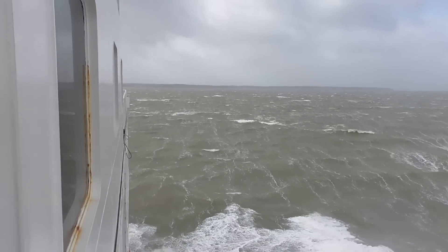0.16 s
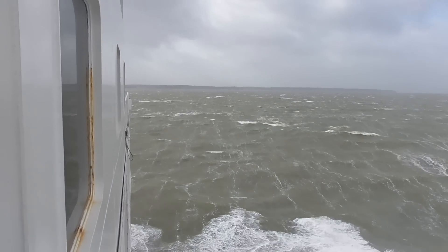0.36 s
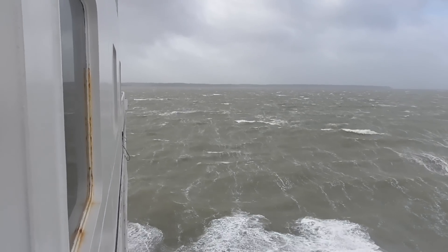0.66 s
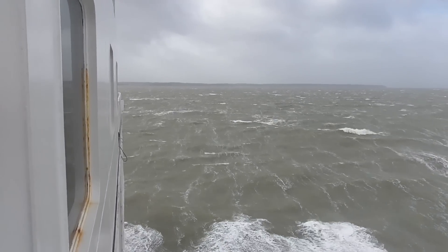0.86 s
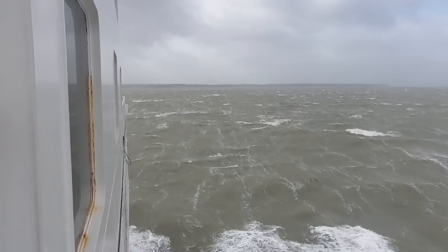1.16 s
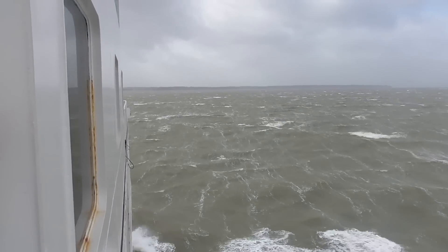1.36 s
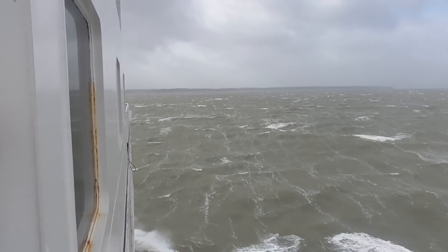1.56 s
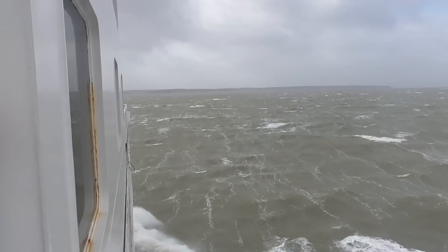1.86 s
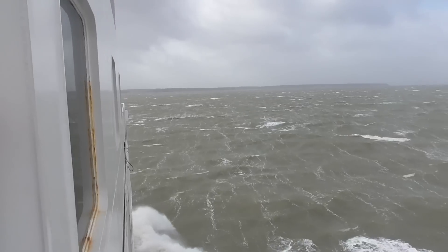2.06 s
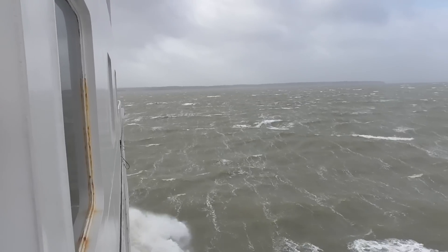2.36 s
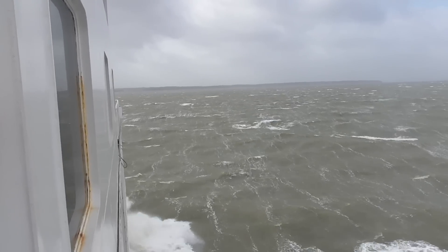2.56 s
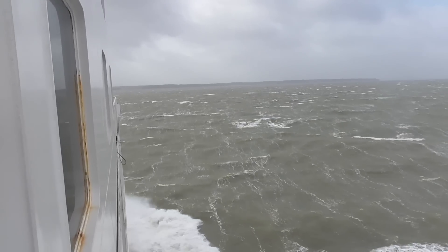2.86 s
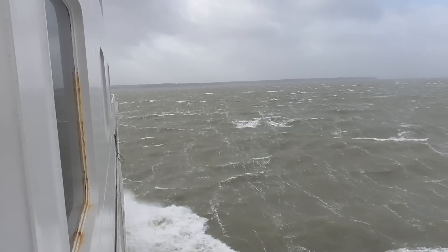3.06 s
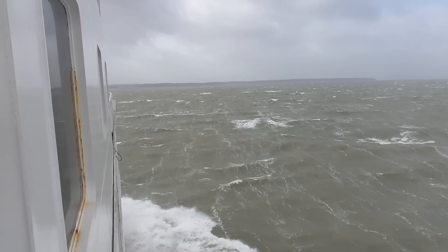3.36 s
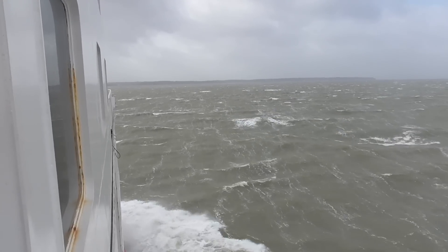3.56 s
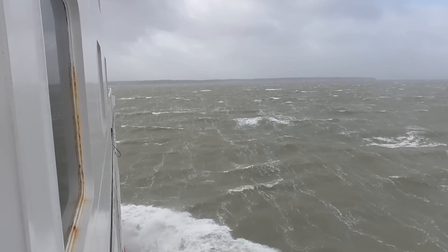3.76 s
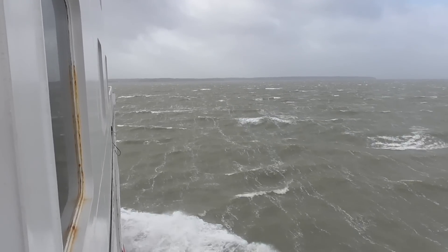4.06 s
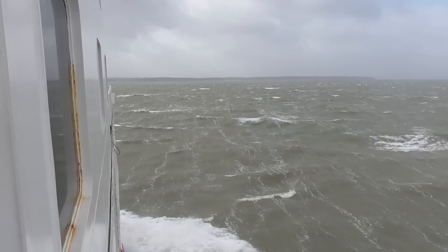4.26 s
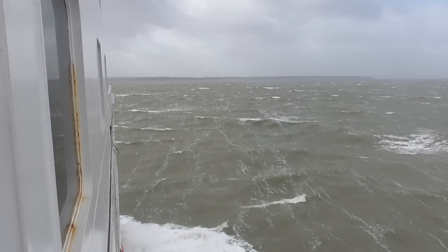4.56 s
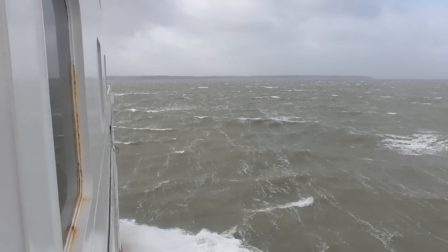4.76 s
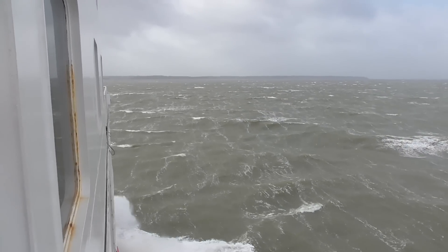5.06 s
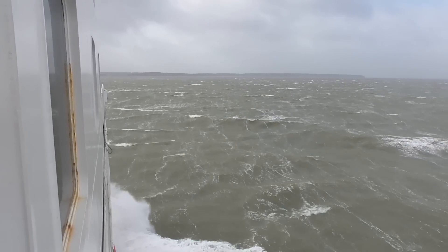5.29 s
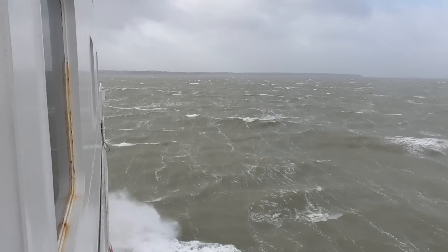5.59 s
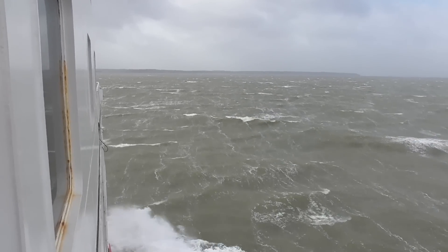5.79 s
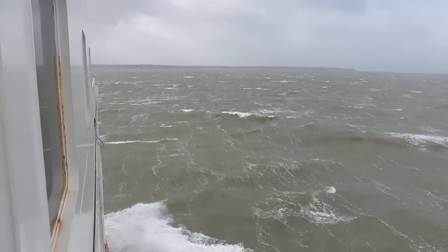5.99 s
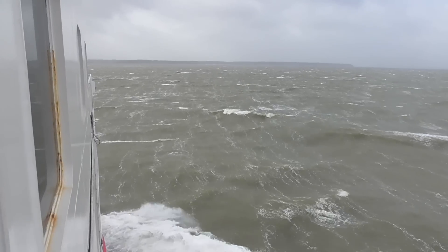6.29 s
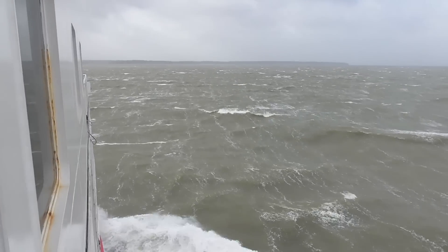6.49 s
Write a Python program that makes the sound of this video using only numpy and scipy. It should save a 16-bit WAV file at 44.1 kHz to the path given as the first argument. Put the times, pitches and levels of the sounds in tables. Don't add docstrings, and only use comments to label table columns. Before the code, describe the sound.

A gale beats on a small microphone on an open ferry deck. A deep, lumpy roar runs throughout, torn by ragged flutter and sudden dull slaps of wind. Hissing puffs of sea and spray ride on top, single drops tick on the housing, and far breakers form a soft hiss behind. The sound is close, loud and nearly overloaded, almost centred.

```python
import sys
import numpy as np
from scipy import signal
from scipy.fft import rfft, irfft, next_fast_len
from scipy.io import wavfile
from scipy.ndimage import uniform_filter1d, map_coordinates

SR = 44100
rng = np.random.default_rng(int(sys.argv[2]) if len(sys.argv) > 2 else 0)


def generate_wav(signal):
    frames = np.transpose(np.atleast_2d(signal))
    scaled = np.clip(frames, -1, 1) * 32767
    pcm = np.round(scaled).astype(np.int16)
    wavfile.write(sys.argv[1], SR, pcm)


def volts_from_db(level):
    exponent = np.asarray(level, float) / 20
    return 10 ** exponent


N = 292383


def unit(x):
    return x / np.sqrt(np.mean(x ** 2) + 1e-20)


def wobble(rate):
    knots = rng.standard_normal(int(N * rate / SR) + 4)
    return map_coordinates(knots, [np.arange(N) * rate / SR])


def coloured(x, points):
    m = next_fast_len(N + 8192)
    f, db = np.transpose(points)
    log_hz = np.log(np.fft.rfftfreq(m, 1 / SR) + 1)
    gain = volts_from_db(np.interp(log_hz, np.log(f + 1), db))
    return unit(irfft(rfft(x, m) * gain, m)[:N])


def patchy(patchy_db):
    z = signal.stft(rng.standard_normal(N), nperseg=256)[2]
    field = uniform_filter1d(rng.standard_normal(z.shape), size=8, axis=0)
    field = uniform_filter1d(field, size=5, axis=1)
    return signal.istft(z * volts_from_db(patchy_db * unit(field)), nperseg=256)[1][:N]


def crackle(rate, spread_db):
    chance, side, size = rng.random((3, N))
    strength = volts_from_db(-spread_db * np.log(size + .003))
    return unit((chance < rate / SR) * np.sign(side - .5) * strength)


def bumps(rows, fineness):
    out, t = np.zeros(N), np.arange(N) / SR
    for s, db, half, size in rows:
        near = slice(max(round((s - .3) * SR), 0), round((s + .3) * SR))
        grip = (1 - fineness) * size + fineness * (1 - size)
        out[near] += 2 * db * grip * np.exp(-((t[near] - s) / half) ** 2)
    return out


def either_side(below, above):
    notch_hz = 6000
    low = signal.butter(4, notch_hz, fs=SR, output="sos")
    high = signal.butter(4, notch_hz, "high", fs=SR, output="sos")
    return signal.sosfilt(low, below) + signal.sosfilt(high, above)


def sea():
    # frequency in Hz, level in dB.
    breakers = [(1200, -40), (2500, -1), (6000, -5.5), (9000, -3.5), (13000, -8), (15500, -15)]
    level_db = -53 + 1.3 * wobble(1.4) + 1.5 * wobble(7.2)
    return volts_from_db(level_db) * coloured(patchy(patchy_db=1.0), breakers)


def side_flicker():
    # start in seconds, length in seconds.
    spells = [(.054, .19), (.425, .14), (.611, .05), (.867, .19), (1.145, .26), (1.819, .255), (2.097, .09),
              (2.26, .09), (2.4, .045), (2.678, .11), (2.91, .115), (3.119, .35), (3.49, .2), (3.862, .09),
              (3.978, .14), (4.164, .046), (4.419, .047), (4.535, .09), (4.767, .047), (4.86, .09),
              (4.976, .07), (5.162, .07), (5.278, .09), (5.441, .1), (5.603, .19), (5.812, .65),
              (6.509, .12)]
    # frequency in Hz, level in dB per Hz.
    apart = [(18, -36), (30, -8), (235, 4.5), (515, -9), (571, -7.5), (1130, -5.5), (2590, -17),
             (5820, -20), (9560, -17.5), (15300, -30)]
    open_share, shut_share, flicker_db = .3, .012, 6
    hz, t, z = signal.stft(rng.standard_normal(N), SR, nperseg=2048)
    share = np.full(len(t), shut_share)
    for start, length in spells:
        share[(t > start + .005) & (t <= start + length)] = open_share
    share *= volts_from_db(flicker_db * wobble(30)[np.minimum(t * SR, N - 1).astype(int)])
    band_of_bin = (np.sqrt(hz / hz[-1]) * 160).astype(int)
    bands = rng.random((161, len(t)))[band_of_bin]
    flicker = signal.istft(z * (bands < share), SR, nperseg=2048)[1][:N]
    return volts_from_db(-53) * coloured(flicker, apart)


def pings():
    # time of the ring in seconds, pitch in Hz, level in dB.
    rings = [
        (2.808, 3600, -35),
        (2.864, 2130, -40),
        (2.9, 2070, -31),
        (3.008, 3550, -41),
    ]
    t = np.arange(N) / SR
    return sum(volts_from_db(db) * np.exp(-((t - s) / 0.0024) ** 2) * np.sin(2 * np.pi * hz * t) for s, hz, db in rings)


def spray():
    # start in seconds, peak in dB, dull part in dB, sizzle in dB.
    big_drops = [(0.234, -23.5, -6.5, -22), (0.341, -25, -7, -23), (0.5566, -30, -2, -19),
                 (0.5965, -25, -12, -19), (0.6709, -36, -18, -24), (1.1697, -24, -8, -25),
                 (1.3908, -21.5, -4.5, -24), (1.4441, -33, -1, -22), (2.1091, -28, -9, -22),
                 (2.458, -23, -12, -26), (2.628, -31, 6, -23), (2.8459, -21, -15, -18),
                 (3.0071, -30, -9, -22), (3.1596, -22, -10, -21), (3.3333, -22, -7, -22),
                 (3.6047, -29, -6, -25), (4.0013, -23, -14, -25), (4.0891, -24, -18, -25),
                 (4.2093, -26, -14, -25), (4.7182, -27, -9, -20), (4.825, -24, -10, -20),
                 (4.9023, -23, -11, -23), (4.9374, -28, -6, -18), (5.1997, -21.5, -6, -27),
                 (5.441, -21, -7, -20), (5.8586, -23, -11, -24), (5.9778, -25, -17, -19),
                 (6.0467, -25, -15, -23), (6.128, -23, -17, -21), (6.1509, -20, -10, -19)]
    parts, t = np.zeros((3, N + SR)), np.arange(SR // 50) / SR
    burst_s, rise_s = 0.0022, 0.0012
    puff = np.exp(-t / burst_s) * (1 - np.exp(-t / rise_s))
    mist = []
    for when, size, tone in rng.random((int(8 * N / SR), 3)):
        peak_db = -34 - 1.5 * np.log(size + .01)
        mist.append((when * N / SR, peak_db, -11 + 5 * (2 * tone - 1), -20))
    for s, db, dull_db, sizzle_db in big_drops + mist:
        part_db = np.array([[dull_db + 3], [-5], [sizzle_db + 0.0]])
        parts[:, round(s * SR):][:, :len(t)] += volts_from_db(db + part_db) * puff
    dull = coloured(rng.standard_normal(N), [(900, -21), (1600, 4.0), (4500, -8.5), (6200, -10.5), (9000, -60)])
    bright = coloured(rng.standard_normal(N), [(4500, -43), (6500, -2), (9500, 3.5), (11500, -3.5),
                                               (13000, -14), (16000, -24)])
    sizzle = coloured(rng.standard_normal(N), [(9500, -40), (12000, -1), (15500, -4), (17000, -60)])
    return (parts[:, :N] * [dull, bright, sizzle]).sum(axis=0)


def slaps():
    # start in seconds, peak in dB.
    strikes = [(0.021, -7), (0.452, -9), (0.669, -1), (0.822, -4), (0.983, -10), (1.16, -14), (1.241, -3),
               (1.269, -3), (1.394, -6), (1.502, -5.5), (1.63, -10), (1.7, -15), (1.848, -4.5), (1.89, -16),
               (1.97, -10), (2.147, -5), (2.518, -5), (2.756, -16), (3.118, -16), (3.396, -2.5),
               (3.91, -13), (3.981, -5), (4.065, -11), (4.318, -8), (4.621, -13), (4.932, -6), (5.394, -7),
               (5.625, -7), (5.7, -6), (6.477, -9.5)]
    strength, t = np.zeros(N + SR), np.arange(SR // 10) / SR
    slap = np.exp(-t / 0.0046) * (1 - np.exp(-t / .0006))
    for s, db in strikes:
        strength[round(s * SR):][:len(t)] += volts_from_db(db - 5) * slap
    thud = coloured(rng.standard_normal(N), [(200, -16), (420, -0.5), (800, -7.5), (1400, -27.5),
                                             (2200, -47), (4000, -80)])
    return strength[:N] * thud


def wind_roar(big, small):
    # frequency in Hz, level in dB per Hz.
    roar_colour = [(12, -54), (20, -32), (64, -8), (134, 0), (202, -0.5), (300, -6), (390, -44.5),
                   (660, -120)]
    return coloured(volts_from_db(0.38 * big + 0.4 * small) * patchy(patchy_db=0.7), roar_colour)


def wind_body(big, small, tiny):
    # frequency in Hz, level in dB per Hz.
    body_colour = [(180, -34), (300, -1), (700, -14), (910, -70), (1540, -120)]
    throb_db = 0.23 * big + 0.86 * small + 1.37 * tiny
    return coloured(volts_from_db(throb_db) * patchy(patchy_db=0.95), body_colour)


def wind_flutter(big, small, tiny):
    # frequency in Hz, level in dB per Hz.
    flutter_colour = [(410, -82), (700, -0.5), (1250, -8.5), (1520, -14.5), (1780, -26.5), (2340, -30),
                      (3960, -120)]
    throb_db = 0.14 * big + 0.97 * small + 2.7 * tiny
    return coloured(volts_from_db(throb_db) * patchy(patchy_db=0.53), flutter_colour)


def wind_hiss(big, small, tiny):
    # frequency in Hz, level in dB per Hz.
    hiss_colour = [(1060, -39), (1800, -2.5), (2100, -1), (2840, -7), (4290, -5.5), (5870, -12.5),
                   (7740, -8.5), (10000, -9), (11600, -13), (15300, -27)]
    fizz = []
    for own_db in (.9, 1.3):
        grains = patchy(patchy_db=1.0) + 0.73 * crackle(rate=1500, spread_db=3.5)
        fizz.append(volts_from_db(own_db * wobble(90)) * grains)
    throb_db = 0.18 * big + 0.37 * small + 1.4 * tiny + 2.5 * wobble(380)
    return coloured(volts_from_db(throb_db) * either_side(*fizz), hiss_colour)


def lulls():
    # centre in seconds, half length in seconds, level change in dB.
    breaks = [
        (0.659, 0.011, 3.5),
        (1.409, 0.0069, -15),
        (2.954, .012, -7),
        (4.178, 0.011, 1),
        (4.226, 0.0066, -15),
    ]
    t = np.arange(N) / SR
    return sum(db * np.exp(-((t - s) / half) ** 4) for s, half, db in breaks)


def wind():
    # time in seconds, wind strength over its mean in dB.
    gale = [(0.0, 4.5), (0.6, 2), (1.21, -0.3), (1.81, 0.1), (2.41, 1.2), (3.01, -0.6), (3.62, -0.6),
            (4.22, -1.1), (4.82, 0), (5.42, 0.3), (6.03, 1.6), (6.63, 0.4)]
    # centre in seconds, level change in dB,
    # half length in seconds, size from 0 small to 1 large.
    surges = [(0.469, 2.2, 0.022, 0.25), (0.703, 1, 0.02, 0.0), (0.828, 2.5, 0.022, 0.62),
              (1.088, 2, 0.027, 0.0), (1.177, 3.5, 0.021, 0.81), (1.242, 4, 0.0065, 0.84),
              (1.337, 2, 0.04, 0.15), (1.706, 1, 0.09, 1.0), (1.816, 2.5, 0.018, 0.0),
              (1.906, 5, 0.022, 0.55), (2.045, 0.5, 0.16, 0.35), (2.38, 1.7, 0.032, 0.35),
              (2.519, 3.5, 0.016, 0.54), (2.639, 3.5, 0.012, 0.045), (2.883, 1.5, 0.031, 0.25),
              (3.023, 2.5, 0.018, 0.43), (3.173, 2.5, 0.027, 1), (3.342, 1, 0.06, 0.25),
              (3.687, 3.8, 0.012, 0.94), (3.996, 3.5, 0.024, 0.72), (4.106, 3.5, 0.058, 0.66),
              (4.29, 2.3, 0.027, 0.43), (4.545, 4, 0.018, 0.42), (4.764, 1, 0.14, 0.99),
              (4.974, 2.5, 0.06, 0.34), (5.243, 1.0, 0.086, 0.0), (5.458, 1.5, 0.017, 1),
              (5.717, 2, 0.029, 0.31), (6.081, 5.5, 0.02, 0.31), (6.385, 2.5, 0.077, 0.34)]
    # centre in seconds, level change in dB,
    # half length in seconds, size from 0 small to 1 large.
    slacks = [(0.192, -4, 0.081, 0.54), (0.32, -3.5, 0.016, 0.6), (0.526, -6, 0.019, 0.12),
              (0.654, -8.5, 0.015, 0.47), (0.874, -7.5, 0.011, 0.64), (0.91, -2.5, 0.049, 1.0),
              (1.237, -2.7, 0.024, 0.22), (1.462, -2.2, 0.035, 0.16), (1.583, -6.5, 0.033, 0.5),
              (1.875, -2.2, 0.015, 0.0), (1.954, -5.5, 0.017, 1.0), (2.29, -3.5, 0.1, 0.32),
              (2.328, -5.5, 0.022, 1.0), (2.608, -5, 0.019, 0.59), (2.693, -2.3, 0.056, 0.18),
              (2.95, -3.5, 0.03, 0.73), (3.51, -2.5, 0.033, 0.93), (3.77, -2.5, 0.11, 0.66),
              (4.052, -10.5, 0.0093, 0.53), (4.171, -6, 0.016, 0.28), (4.393, -3.5, 0.022, 0.092),
              (4.517, -2.5, 0.024, 1), (4.567, -3.5, 0.09, 0.19), (4.778, -5, 0.018, 0.18),
              (4.871, -4, 0.034, 0.36), (5.162, -4.5, 0.032, 0.2), (5.575, -2.4, 0.021, 1.0),
              (5.611, -6.5, 0.0067, 0.33), (5.912, -2.3, 0.082, 0.5), (6.44, -8.5, 0.012, 0.93)]
    # level in dB, growth in dB per dB of gale, fineness from 0 to 1.
    layers = [
        (-14, 0.46, 0),
        (-19, 0.5, 0.58),
        (-29, 0.49, 0.87),
        (-42.5, 0.93, .99),
    ]
    gale_db = np.interp(np.arange(N) / SR, *np.transpose(gale))
    roar_db, body_db, flutter_db, hiss_db = [
        db + grows * gale_db + bumps(surges + slacks, fine) for db, grows, fine in layers]
    big, small, tiny = wobble(24), wobble(55), wobble(140)
    low = volts_from_db(roar_db) * wind_roar(big, small) + volts_from_db(body_db) * wind_body(big, small, tiny)
    flutter = volts_from_db(flutter_db) * wind_flutter(big, small, tiny)
    hiss = volts_from_db(hiss_db) * wind_hiss(big, small, tiny)
    return low + volts_from_db(lulls()) * (flutter + hiss)


def scene():
    return sea() + pings() + spray() + slaps() + wind() + side_flicker() * [[1], [-1]]


def starved(x):
    # frequency in Hz, share of strips lost.
    losses = [(4500, 0), (5900, .1), (7000, .02), (11000, .06), (12500, .22), (14000, .36), (15000, .44),
              (15500, .6)]
    hz, t, z = signal.stft(x, SR, nperseg=2048)
    f, share = np.transpose(losses)
    lost = np.interp(hz, f, share)[:, None]
    strips = rng.random((len(hz) // 3 + 1, len(t) // 3 + 1))
    strips = np.repeat(np.repeat(strips, 3, axis=0), 3, axis=1)
    kept = strips[:len(hz), :len(t)] > lost
    return signal.istft(z * kept / np.sqrt(1 - lost), SR, nperseg=2048)[1][:, :N]


def top_cut(x):
    return signal.sosfilt(signal.butter(12, 15430, fs=SR, output="sos"), x)


def record(dry):
    held = dry / (1 + np.abs(dry / .98) ** 10) ** (1 / 10)
    return top_cut(starved(held))


dry = scene()
out = record(dry)
generate_wav(out)
```